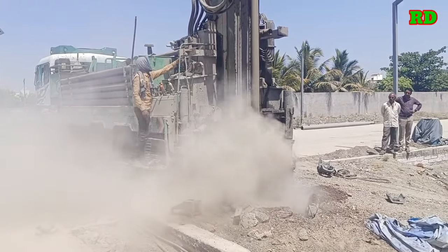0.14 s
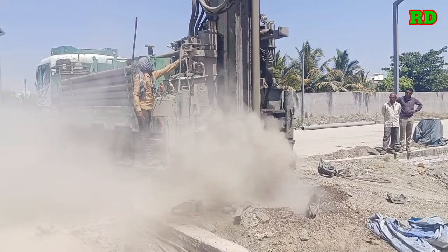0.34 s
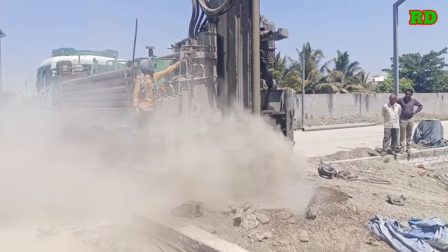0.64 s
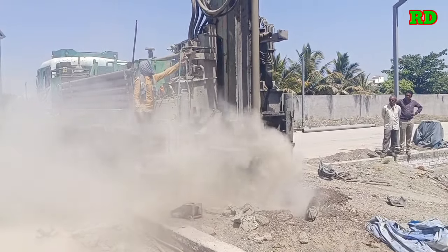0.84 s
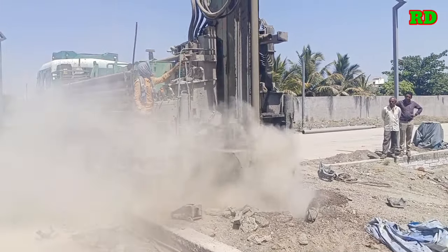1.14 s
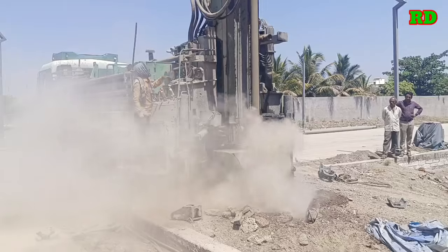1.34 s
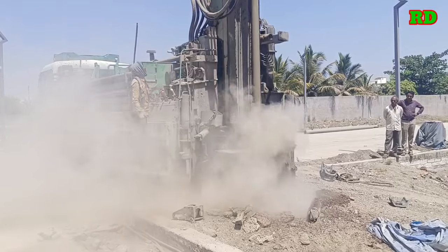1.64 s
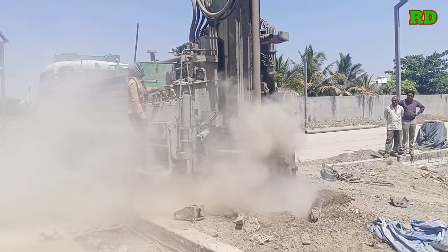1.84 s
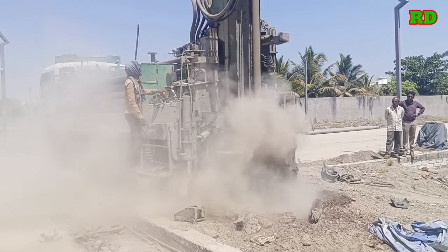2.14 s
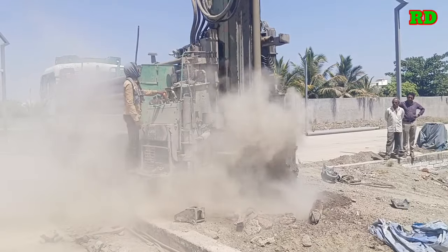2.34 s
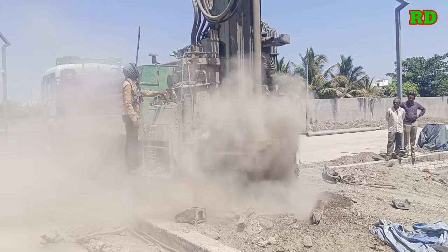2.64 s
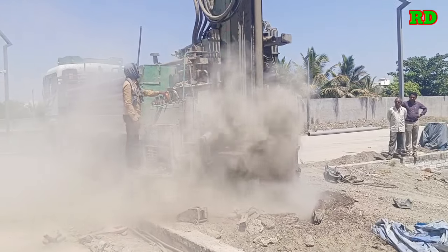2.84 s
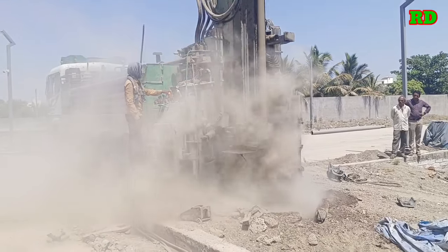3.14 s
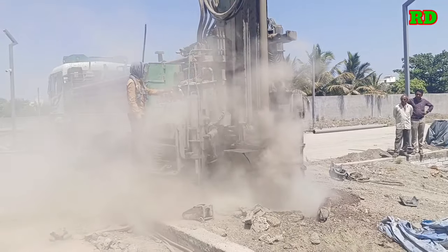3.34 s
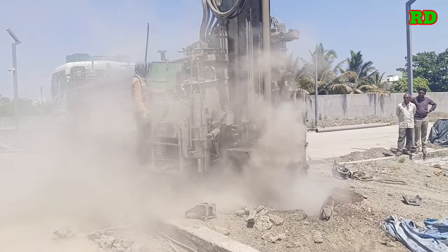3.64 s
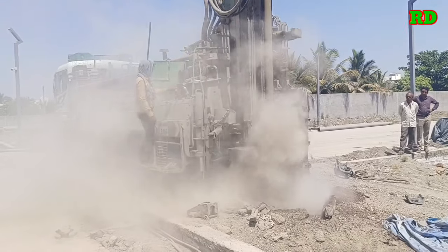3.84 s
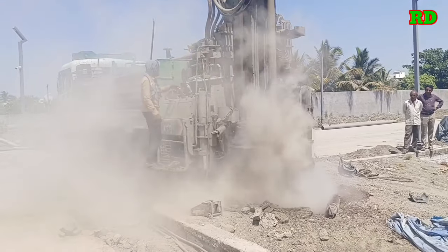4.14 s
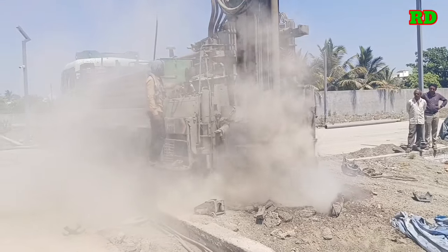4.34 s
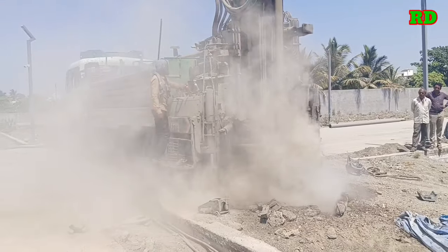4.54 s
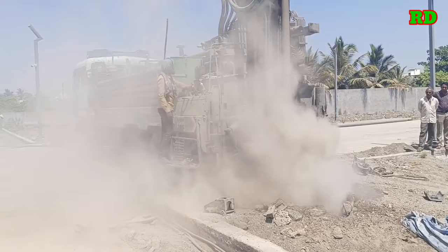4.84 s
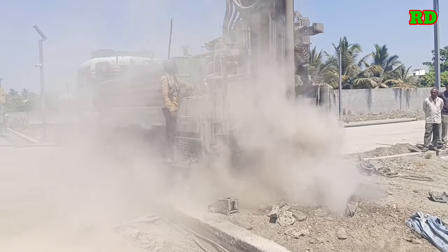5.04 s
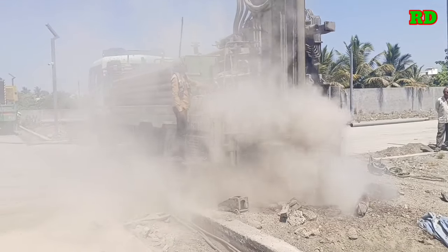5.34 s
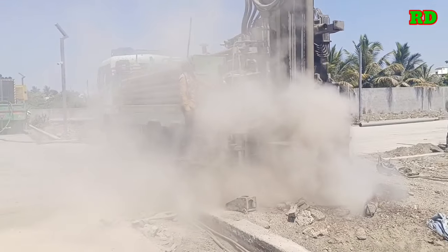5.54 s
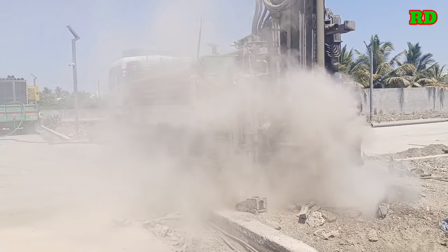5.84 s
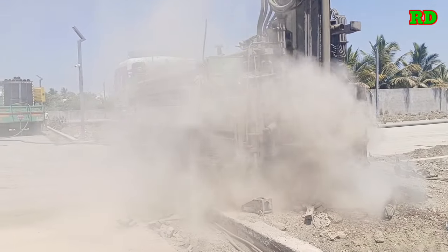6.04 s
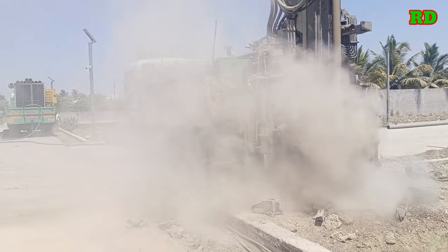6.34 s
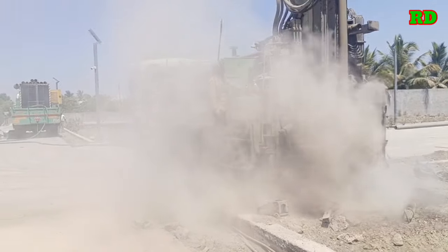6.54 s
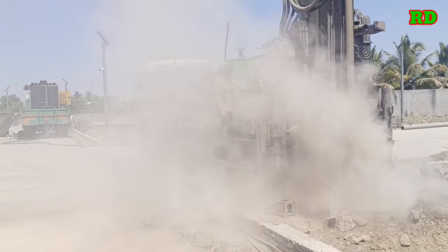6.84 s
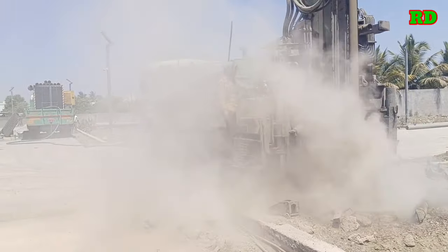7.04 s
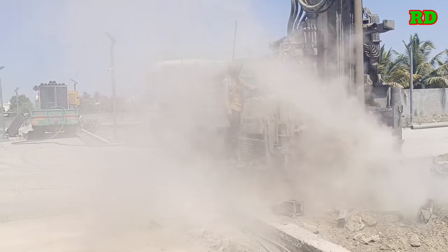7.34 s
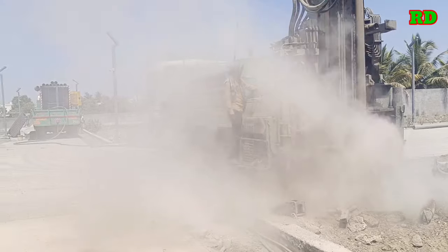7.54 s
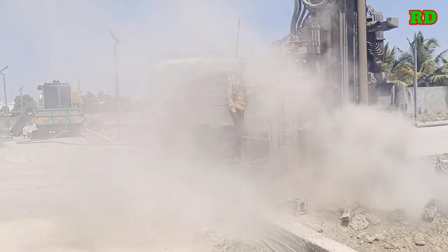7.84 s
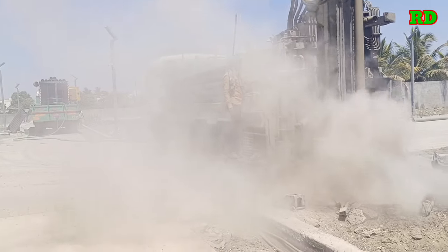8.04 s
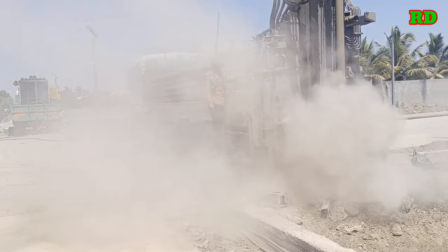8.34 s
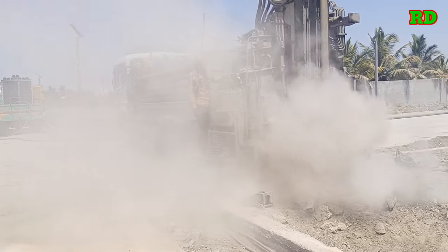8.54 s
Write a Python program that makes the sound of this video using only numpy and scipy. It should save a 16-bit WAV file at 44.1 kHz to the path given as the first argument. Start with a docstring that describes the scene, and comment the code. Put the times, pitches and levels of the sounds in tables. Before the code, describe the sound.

Rapid pneumatic hammering runs from start to end: bright, piercing steel clangs around a mid-high pitch, duller mast knocks and low thumps, with air puffs between strokes. Grit hisses on steel, pipes ring and truck panels hum. A diesel engine roars beneath with a faint wavering whine. The hammering gets a little stronger in the last seconds. Open air, close stereo pickup with little echo.

```python
"""A hard metallic clatter, about 19 blows a second, over a ringing pipe: a truck-mounted well rig outdoors.
An air hammer in rock: each blow is shaped noise for pipe clang, mast knock and grit spray, plus a filtered
ground thump; spent air puffs out half a stroke later. Noise bursts ring the pipe modes beside a steady sine
note, and the thumps ring the truck panels. Beneath run a diesel (filtered noise, firing sine) and a
compressor whine (wavering sine)."""
import sys
import numpy as np
from scipy import signal
from scipy.fft import rfft, irfft, next_fast_len
from scipy.io import wavfile
from scipy.ndimage import uniform_filter1d, map_coordinates

SR = 44100
rng = np.random.default_rng(int(sys.argv[2]) if len(sys.argv) > 2 else 0)


def materialize(psi):
    """Save the field psi as 16-bit PCM at rate SR to the path in sys.argv[1].

    A 1-D psi becomes a single channel; in a 2-D psi each row is a channel.
    """
    bounded = np.clip(np.atleast_2d(psi).T, -1, 1)
    quanta = np.round(bounded * 32767).astype(np.int16)
    wavfile.write(sys.argv[1], SR, quanta)


N = 384111

# Piston pace: [t/s, rate/(blows/s)]
PACE_PER_S = [(0.0, 19.22), (0.4, 19.01), (1.1, 18.74), (2.2, 18.9), (4.0, 18.97), (4.6, 19.09),
              (5.6, 18.85), (7.2, 19.09), (8.1, 19.74), (8.4, 19.4), (8.71, 19.2)]
FIRST_BLOW_S = .0144
JITTER_S = .0012  # rms offset of an ordinary blow from the beat
# Rock hardness, ordinary blows: [t/s, relative clang level/dB]
HARDNESS_DB = [(0, -21.5), (.9, -18.5), (1.5, -22.5), (2.7, -23.5), (3.2, -20), (4.5, -18.5), (6.2, -19.5),
               (8.7, -17)]
# Ordinary blows: mean relative levels, then rms blow-to-blow spread
KNOCK_DB, SPRAY_DB = -26.5, -33
CLANG_SCATTER_DB, KNOCK_SCATTER_DB, SPRAY_SCATTER_DB = 3, 2, 4
# Bit meets solid stone: [t/s, clang/dB, mast knock/dB, grit spray/dB], levels relative
SOLID_STONE_BLOWS = [(0.0655, -16, -28, -29), (0.1176, -16.5, -22.5, -36), (0.274, -17, -22.5, -27),
                     (0.483, -14.5, -26, -26), (0.5865, -17, -27.5, -30), (0.641, -13, -27, -30),
                     (0.696, -13.5, -28, -35), (1.014, -14, -25, -25), (1.173, -15, -27, -24),
                     (1.2805, -17.5, -24, -26), (1.3872, -16.5, -24, -29), (2.4458, -13.5, -22.5, -34),
                     (3.0818, -13.5, -23.5, -28.5), (3.1898, -15, -22, -32), (3.3475, -16, -26.5, -32),
                     (3.717, -13.5, -24.5, -36), (3.928, -13, -24.5, -28), (4.2933, -12, -21, -28),
                     (4.346, -14, -20, -29), (4.8728, -15.5, -28, -32), (6.0867, -15.5, -24, -28),
                     (6.4606, -11.5, -25, -28), (6.5662, -15, -21.5, -32), (6.774, -14.5, -25, -33),
                     (6.982, -17.5, -20.5, -31), (7.091, -15.5, -24, -28), (7.195, -13, -20.5, -30),
                     (7.7633, -13, -27, -28), (8.02, -12, -29, -41), (8.171, -11, -26.5, -38),
                     (8.3255, -12.5, -24.5, -38), (8.3734, -15, -21, -29)]
# Bit chatter as it bites: [t/s, level/dB]
CHATTER_DB = [(0, -43.5), (2.5, -43.5), (4.8, -41), (6, -39.5), (6.8, -36), (7.7, -41.5), (8.7, -43)]
# Clang spectrum of the drill pipe: [f/Hz, relative level/dB]
CLANG_SPECTRUM = [(1200, -29), (1600, -5.5), (2050, -11), (2450, -14), (2720, -6.5), (2870, 14), (2950, -1),
                  (3050, 3), (3350, -16.5), (4500, -35), (7000, -25.5), (9000, -28)]
# Mast knock spectrum: [f/Hz, relative level/dB]
KNOCK_SPECTRUM = [(150, -18.5), (290, 1.5), (450, -6.5), (580, -13), (780, -2), (970, 4.5), (1120, -11.5),
                  (1280, -4), (1450, -13), (1600, -2), (2200, -10.5), (3500, -43.5)]
# Drill pipe modes driven by chatter: [f/Hz, relative level/dB, t60/s]
CHATTER_MODES = [(3667, 3.5, 0.096), (4090, -5, 0.045), (4210, -3, 0.19), (4963, -6.5, 0.088)]

# Steady pipe note: mean frequency; random swell depth and knot rate
PIPE_HZ = 1771
SWELL_DB, SWELL_KNOTS_PER_S = 2.5, 11
# Pipe note with its low ring: [t/s, relative level/dB]
NOTE_DB = [(0.0, -35), (0.09, -25.5), (0.14, -36), (0.41, -40.5), (1.75, -35.5), (4.73, -38), (4.92, -30),
           (5.07, -48), (5.17, -31.5), (5.29, -38), (6.43, -37), (7.08, -31.5), (7.11, -40), (7.91, -34),
           (7.98, -42.5), (8.56, -36), (8.61, -47), (8.71, -35)]
# High pipe ring: [t/s, relative level/dB]
HIGH_RING_DB = [(0, -42.5), (3, -42), (5.5, -41.5), (6, -49), (8.7, -47)]
# Squeals of the high ring: [t/s, rise above its level/dB]
SQUEALS_DB = [(1.19, 9), (1.99, 10), (2.26, 9.5), (2.42, 7), (3.09, 11.5), (3.62, 7.5), (4.70, 8.5),
              (4.87, 8), (5.51, 9), (7.67, 12)]
SQUEAL_S = 0.041  # half-width where the dB rise falls to 1/e
# Pipe modes around the steady note: [f/Hz, relative level/dB, t60/s]
LOW_RING_MODES = [(1775, 0, .4), (1797, -2, .25)]
# High pipe modes: [f/Hz, relative level/dB, t60/s]
HIGH_RING_MODES = [(6053, 4, 0.2), (12106, -13.5, 0.06)]
# Remaining pipe modes: [f/Hz, relative level/dB, t60/s]
PIPE_MODES = [(975, 0, .07), (1883, 0, .12), (1950, -5, .25), (2067, -3, .15), (2140, -5, .25),
              (2640, -2, .3), (3149, -3, .25), (3172, -4, .25), (4375, -11, .15), (4550, -15, .15),
              (4830, -12, .08), (5442, -10, .12), (5590, -6, .08), (5780, -4, .08), (6500, -12, .08)]

# Strength of the piston stroke: [t/s, relative level/dB]
EFFORT_DB = [(0, -29.5), (1.5, -30.2), (3, -29.5), (4.4, -28.3), (5.5, -29), (7, -28.3), (7.7, -26.5),
             (8.7, -26.7)]
# Ground thump spectrum: [f/Hz, relative level/dB]
THUMP_SPECTRUM = [(20, -16), (40, -4.5), (75, 4), (115, -3), (150, -9.5), (190, 1.5), (230, -32.5),
                  (265, 6), (300, -0.5), (340, 3), (420, -18), (600, -37), (1200, -43)]
# Spent-air puff spectrum: [f/Hz, relative level/dB]
PUFF_SPECTRUM = [(20, -71), (36, -16), (57, -2), (88, 4), (115, -1), (135, -0.5), (155, -14.5), (185, -1.5),
                 (225, -26), (265, -2.5), (340, -9.5), (450, -19.5), (800, -39), (1500, -49.5)]
# Turbulence at the mouth of the hole: [f/Hz, relative level/dB]
GUSH_SPECTRUM = [(100, -26.5), (300, 2), (500, -12), (950, -13), (2000, -21), (4000, -36)]
# Grit on steel: [f/Hz, relative level/dB]
SPRAY_SPECTRUM = [(1500, -56), (3300, 11), (4600, 5.5), (5200, -4), (5600, 17), (6300, 4.5), (7000, 7.5),
                  (10000, 1.5), (12100, -0.5), (15000, -3)]
# Truck panel modes: [f/Hz, relative level/dB, t60/s]
FRAME_MODES = [(264.5, 0, .35), (303, -9, .2), (322, -8, .15), (340, -3, .25), (378, -8, .25),
               (436, -11, .2), (473, -13, .2)]

# Engine load: [t/s, relative roar level/dB]
LOAD_DB = [(0, -27.5), (2, -27.5), (4, -27.5), (5.5, -27.5), (7, -26.5), (8.7, -26)]
# Engine roar spectrum: [f/Hz, relative level/dB]
ROAR_SPECTRUM = [(20, -28), (45, -28), (80, -2), (150, -10), (220, -5.5), (310, 0), (589, -18.5),
                 (966, -11.5), (1190, -18.5), (1480, -21), (1900, -15), (2480, -19), (2930, -11),
                 (3880, -27), (5940, -19), (7000, -35), (9100, -36.5)]
FIRING_HZ, WHINE_HZ = 83.3, 2282  # mean diesel firing rate, mean compressor whine

# Left-right likeness of diffuse noise: [f/Hz, correlation]
LIKENESS = [(130, 0.94), (300, 1), (640, 0.64), (1000, 0.99), (1400, 0.096), (3000, 0.49), (4200, 0.12),
            (12000, 0.11)]
# Arrival lead of the left port for grit and high ring: [t/s, lead/ms]
LEFT_LEAD_MS = [(0, 0.18), (3, 0.16), (4.7, 0.092), (5.7, 0.072), (6.5, 0.0084), (8.2, 0.012), (8.7, 0.069)]
# Port balance: [f/Hz, left minus right/dB]
BALANCE_DB = [(130, 0), (330, -2), (600, 0.5), (1000, -2), (1700, -1), (2400, -6), (3500, -2), (4700, -6.5),
              (6000, -0.5), (7100, 8), (8000, -1.5), (11000, 0), (12000, -8), (13500, -13.5), (15000, 0)]
# Microphone response, notched in the treble: [f/Hz, gain/dB]
MIC_DB = [(7000, 1), (7700, -20), (8400, -5.5), (8900, -27), (10300, -1.5), (11100, -22), (12000, 1.5)]
TOP_HZ = 15600


def strokes():
    """The heavy piston strikes each time its pace adds up to a whole cycle; returns t/s."""
    cycles = np.cumsum(curves(PACE_PER_S)[0]) / SR
    whole = np.arange(int(cycles[-1]) + 1)
    return FIRST_BLOW_S + np.searchsorted(cycles, whole) / SR


def impacts(beat_s):
    """One blow a stroke, set by rock and chance; returns t/s, clang/dB, knock/dB, spray/dB."""
    late, clang, knock, spray = rng.standard_normal((len(beat_s), 4)).T
    hardness_db = np.interp(beat_s, *np.transpose(HARDNESS_DB))
    blows = np.column_stack([beat_s + JITTER_S * late,
                             hardness_db + CLANG_SCATTER_DB * clang,
                             KNOCK_DB + KNOCK_SCATTER_DB * knock,
                             SPRAY_DB + SPRAY_SCATTER_DB * spray])
    # solid stone replaces the nearest ordinary blow
    for hard in SOLID_STONE_BLOWS:
        blows[np.argmin(np.abs(beat_s - hard[0]))] = hard
    return blows.T


def hammer(blows):
    """The stress wave of each blow rattles up the pipe, then shakes the mast."""
    t_s, clang_db, knock_db, _ = blows
    clang_gain = amp(clang_db)
    strike = swells(t_s - .002, clang_gain, rise_s=0.0013, decay_s=0.0093, grain_db=0.0)
    rattle = swells(t_s - .002, clang_gain, rise_s=0.0047, decay_s=0.025, grain_db=-1)
    clang = amp(-30) * unit(strike + amp(-8) * rattle) * hiss(CLANG_SPECTRUM)

    chatter_drive = bursts(t_s - .001, clang_gain, rise_s=0.0023, decay_s=0.0039)
    chatter = amp(curves(CHATTER_DB)[0]) * ring(chatter_drive, CHATTER_MODES)

    shake = swells(t_s - 0.0015, amp(knock_db), rise_s=0.0053, decay_s=0.0098, grain_db=0.5)
    knock = amp(-33.5) * shake * hiss(KNOCK_SPECTRUM)
    return clang + chatter + knock


def pipe(blows):
    """The pipe sings one steady note; noise bursts at the blows ring its other modes in new phases."""
    t_s = blows[0]
    note_hz = PIPE_HZ + 2.41 * wobble(16)
    low_drive = bursts(t_s + 0.015, scatter(0.81, t_s), rise_s=0.0068, decay_s=0.018)
    beating = even(ring(low_drive, LOW_RING_MODES), size=5000)
    low_db = curves(NOTE_DB)[0] + SWELL_DB * wobble(SWELL_KNOTS_PER_S)
    low = amp(low_db + 1.8) * unit(unit(tone(note_hz)) + beating)

    now_s = np.arange(N) / SR
    squeal_db = sum(db * np.exp(-((now_s - at_s) / SQUEAL_S) ** 2) for at_s, db in SQUEALS_DB)
    high_db = curves(HIGH_RING_DB)[0] + 1.36 * wobble(14) + squeal_db
    high_drive = bursts(t_s + 0.0047, scatter(1.8, t_s), rise_s=0.0014, decay_s=0.0094)
    high = amp(high_db + 2.5) * even(ring(high_drive, HIGH_RING_MODES), size=4000)

    rest_drive = bursts(t_s - .002, scatter(1, t_s), rise_s=0.0024, decay_s=0.026)
    rest = amp(-36) * ring(rest_drive, PIPE_MODES)
    return low + aside(high) + rest


def piston(beat_s):
    """Each stroke sends a thump into the ground, then a puff of spent air."""
    down_s = beat_s + .0027 + .00025 * rng.standard_normal(len(beat_s))
    vent_s = beat_s + .0309 + .00025 * rng.standard_normal(len(beat_s))
    thump = -amp(-3) * body(taps(down_s, scatter(0.41, beat_s)), THUMP_SPECTRUM)
    puff = amp(0.5) * body(taps(vent_s, scatter(0.23, beat_s)), PUFF_SPECTRUM)
    # the puff breaks up into turbulence
    breakup = swells(vent_s - .001, scatter(1.7, beat_s), rise_s=0.0015, decay_s=0.014, grain_db=0.5)
    gush = amp(-12.5) * breakup * hiss(GUSH_SPECTRUM)
    return amp(curves(EFFORT_DB)[0]) * (thump + puff + gush)


def grit(blows):
    """Every blow flings rock chips against the steel: a smooth swell of shaped noise at each blow."""
    t_s, _, _, spray_db = blows
    spray = swells(t_s - .003, amp(spray_db), rise_s=0.0045, decay_s=0.029, grain_db=0)
    return amp(-37) * spray * hiss(SPRAY_SPECTRUM)


def frame(beat_s):
    """Thumps ring the truck panels, loudest when the beat falls in step with their modes."""
    shake_s = beat_s + 0.0028 + .0003 * rng.standard_normal(len(beat_s))
    shakes = taps(shake_s, -scatter(1.2, beat_s))
    return amp(-37.0) * ring(shakes, FRAME_MODES)


def engine():
    """Diesel firing throbs under a noise roar; the compressor adds a thin wavering whine."""
    roar_db = curves(LOAD_DB)[0] - 3.5 + 0.71 * wobble(5.6)
    roar = amp(roar_db) * body(spread(rng.standard_normal((2, N))), ROAR_SPECTRUM)
    firing = amp(-39.5) * unit(tone(FIRING_HZ + 2 * wobble(5)))
    whine_db = -47.0 + 1.7 * wobble(13)
    whine = amp(whine_db) * unit(tone(WHINE_HZ + 3.32 * wobble(16)))
    return roar + firing + whine


def aside(pair):
    """A source off to the left reaches the left port slightly first."""
    lead = curves(LEFT_LEAD_MS)[0] * SR / 1000  # samples
    left = map_coordinates(pair[0], [np.arange(N) + lead / 2], order=5)
    right = map_coordinates(pair[1], [np.arange(N) - lead / 2], order=5)
    return np.array([left, right])


def ring(drive, modes):
    """Steel modes, each a decaying sine, kept ringing by the drive; rms 1."""
    t = np.arange(SR // 2) / SR
    tail = 0
    for hz, db, t60_s in modes:
        decay = amp(db - 60 * t / t60_s) / np.sqrt(t60_s)
        tail = tail + decay * np.sin(2 * np.pi * hz * t)
    return unit(convolved(drive, tail))


def body(x, spectrum, size=16384):
    """x through a causal (minimum-phase) resonant body with the given spectrum; rms 1."""
    gain = amp(along(spectrum, np.fft.rfftfreq(size, 1 / SR)))
    cepstrum = irfft(np.log(gain))
    # folding the cepstrum to positive time makes the response causal
    fold = np.r_[1, np.full(size // 2 - 1, 2), np.zeros(size // 2)]
    response = irfft(np.exp(rfft(cepstrum * fold)))
    return unit(convolved(x, response))


def hiss(spectrum):
    """Stereo noise in a resonant body, at an even level."""
    return even(body(spread(rng.standard_normal((2, N))), spectrum), size=400)


def bursts(times_s, gains, rise_s, decay_s):
    """Stereo bursts of white noise."""
    return swells(times_s, gains, rise_s, decay_s, 0) * spread(rng.standard_normal((2, N)))


def swells(times_s, gains, rise_s, decay_s, grain_db):
    """An envelope of rms 1 that swells and dies after each time; smooth if grain_db is 0, else grainy."""
    t = np.arange(SR // 8) / SR
    shape = (1 - np.exp(-(t / rise_s) ** 2)) * np.exp(-t / decay_s)
    envelope = convolved(taps(times_s, gains), shape)
    return unit(envelope * amp(grain_db * wobble(1500)))


def spread(pair):
    """Two unrelated signals become left and right with the LIKENESS correlation; rms 1."""
    def mid_side_gains(hz):
        angle = np.arccos(np.clip(along(LIKENESS, hz), -1, 1)) / 2
        return np.array([np.cos(angle), np.sin(angle)])
    mid, side = filtered(pair, mid_side_gains)
    return unit(np.array([mid + side, mid - side]))


def even(pair, size):
    """A stereo signal levelled to rms 1 by its running power over size samples."""
    power = uniform_filter1d(np.mean(pair ** 2, axis=0), size)
    return pair / np.sqrt(np.abs(power) + 1e-9)


def tone(hz):
    """Sine of a varying frequency."""
    return np.sin(2 * np.pi * np.cumsum(hz) / SR)


def taps(times_s, gains):
    """One impulse at each time."""
    return np.bincount(np.clip(times_s * SR, 0, N).astype(int), gains, N + 1)[:N]


def scatter(spread_db, times_s):
    """A random gain for each of the times."""
    return amp(spread_db * rng.standard_normal(len(times_s)))


def wobble(knots_per_s):
    """A smooth random curve through normal-distributed knots."""
    knots = rng.standard_normal(int(N * knots_per_s / SR) + 4)
    return map_coordinates(knots, [np.arange(N) * knots_per_s / SR])


def curves(rows):
    """One value per sample for each column after t/s."""
    t_s, *columns = np.transpose(rows)
    return [np.interp(np.arange(N) / SR, t_s, column) for column in columns]


def along(points, hz):
    """[f/Hz, value] points read on a log-frequency axis."""
    f, v = np.transpose(points)
    return np.interp(np.log(hz + 1), np.log(f + 1), v)


def filtered(x, response):
    """x times a response of frequency, zero-padded."""
    m = next_fast_len(N + SR // 2)
    return irfft(rfft(x, m) * response(np.fft.rfftfreq(m, 1 / SR)), m)[..., :N]


def convolved(x, tail):
    """Every sample of x sets off the tail."""
    return signal.fftconvolve(np.atleast_2d(x), np.atleast_2d(tail), axes=1)[:, :N]


def amp(db):
    """Decibels to gain."""
    return 10 ** (np.asarray(db) / 20)


def unit(x):
    """x at rms 1."""
    return x / np.sqrt(np.mean(x ** 2) + 1e-20)


def scene():
    """The whole rig, main source first."""
    beat_s = strokes()
    blows = impacts(beat_s)
    drilling = hammer(blows) + pipe(blows) + piston(beat_s) + aside(grit(blows))
    return drilling + frame(beat_s) + engine()


def record(dry):
    """Two unequal microphone ports and the band limit."""
    def ports(hz):
        half_balance = np.array([[.5], [-.5]]) * along(BALANCE_DB, hz)
        return amp(along(MIC_DB, hz) + half_balance) * (hz < TOP_HZ)
    return filtered(dry, ports)


dry = scene()
out = record(dry)
materialize(out)
```